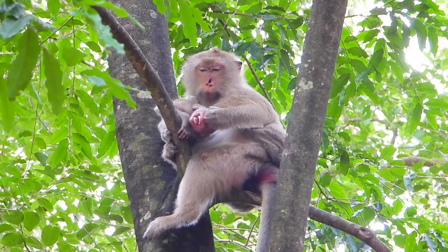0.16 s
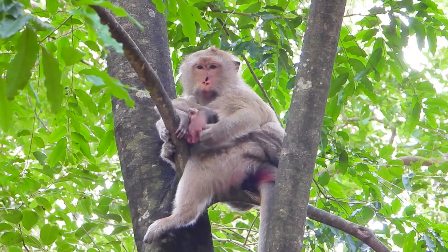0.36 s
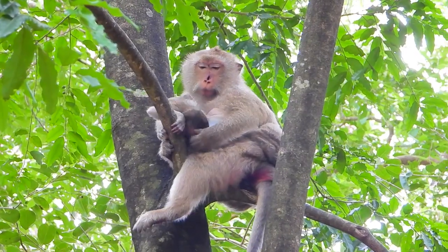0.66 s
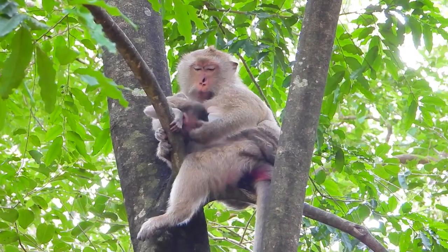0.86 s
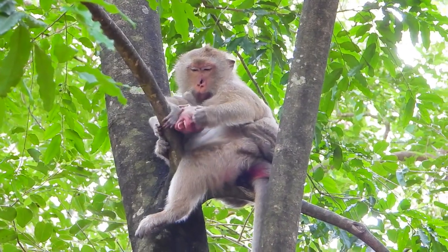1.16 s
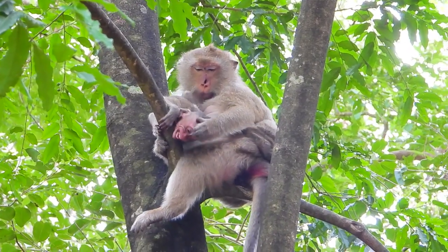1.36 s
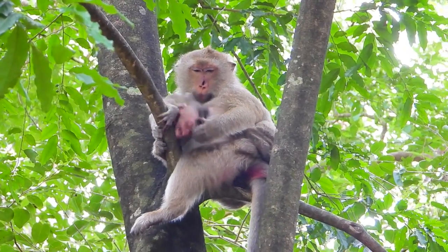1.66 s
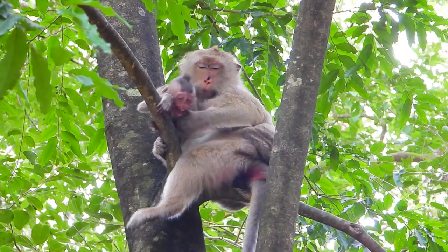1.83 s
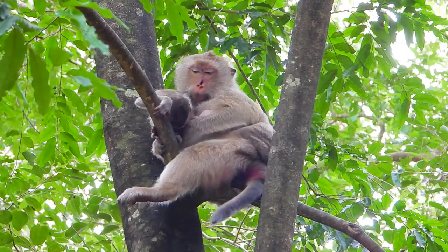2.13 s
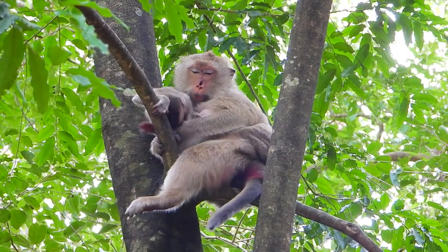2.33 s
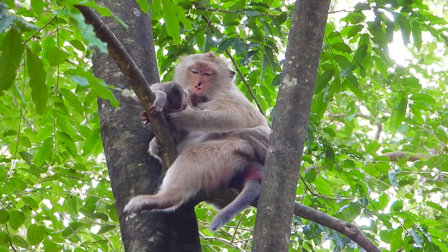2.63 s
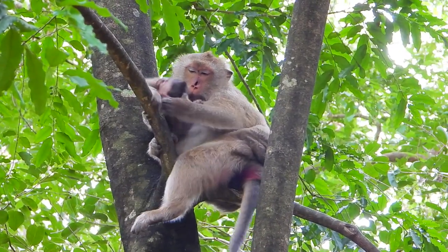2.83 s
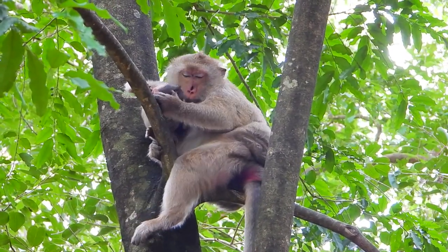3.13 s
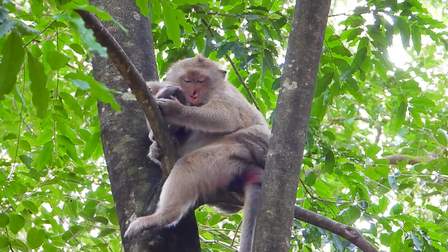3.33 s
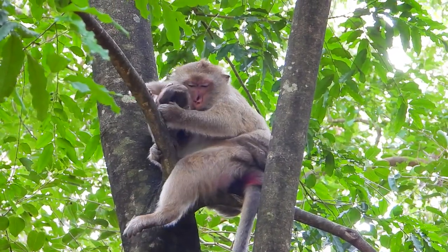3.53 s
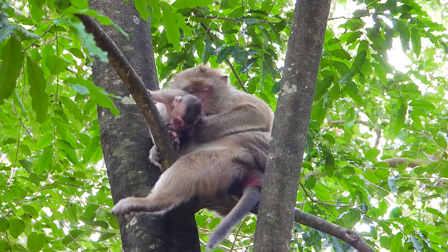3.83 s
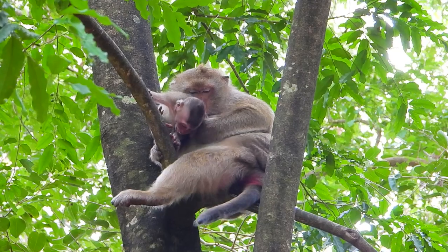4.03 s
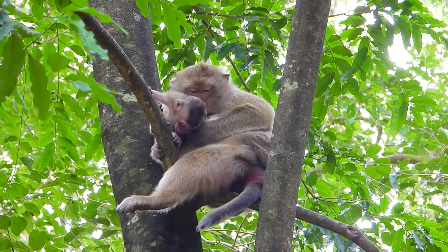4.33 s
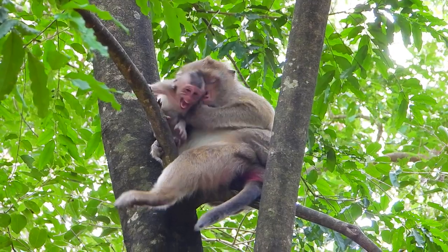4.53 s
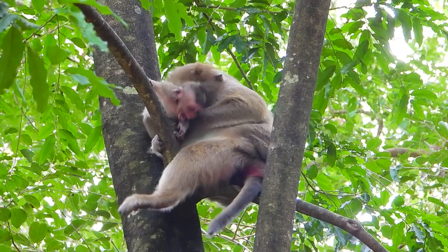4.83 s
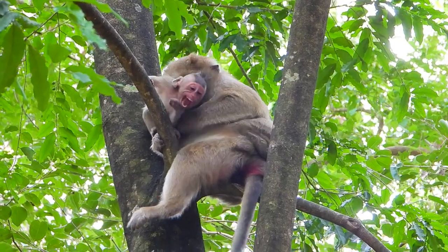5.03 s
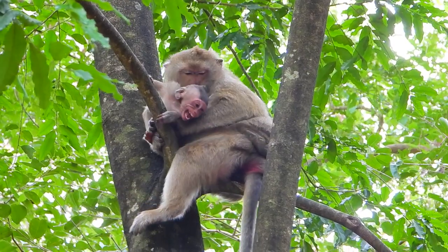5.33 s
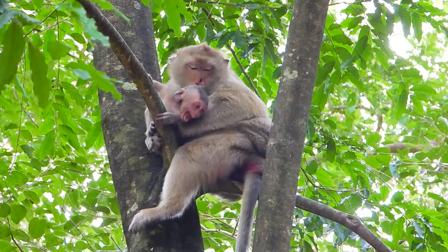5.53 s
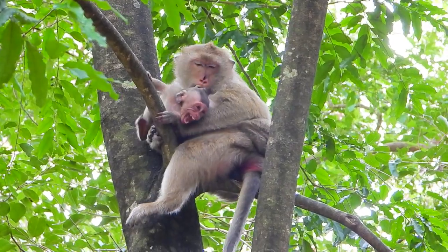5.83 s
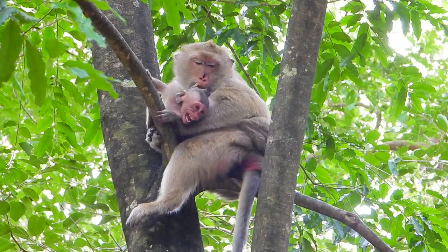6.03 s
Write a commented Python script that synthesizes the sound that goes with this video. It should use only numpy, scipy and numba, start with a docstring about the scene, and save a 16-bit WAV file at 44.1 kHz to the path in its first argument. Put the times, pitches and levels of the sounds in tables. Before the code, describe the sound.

Repeated shrill, rasping screams from a small macaque, each ending in a falling whistle, over faint forest murmur and leaf hiss.

```python
"""A rasping screech is already under way: a young macaque, held by an adult up in a tree, screams repeatedly.
Most screams open with a thin gliding whistle, break into a screech and end on a whistle that drops in pitch.
Ragged pulses ring the throat's resonances; the whistles are sine tones with weak, wavering overtones. Close
surfaces, trunks and canopy echo it over a low murmur and a hiss of leaves, both of filtered noise. A faint
hoot, a sine with a slightly wavering pitch, sounds early on; later two quick knocks of noise ring a twig."""
import sys
import numpy as np
from scipy import signal
from scipy.fft import rfft, irfft
from scipy.io import wavfile
from scipy.ndimage import uniform_filter1d
from numba import njit

SR = 44100
rng = np.random.default_rng(int(sys.argv[2]) if len(sys.argv) > 2 else 0)


def output_pcm(signal):
    """Save a mono or channel-first signal as 16-bit PCM at the path in sys.argv[1].

    Samples are clipped to [-1, 1] before scaling.
    """
    pcm = np.clip(np.atleast_2d(signal).T, -1, 1) * 32767
    wavfile.write(sys.argv[1], SR, np.round(pcm).astype(np.int16))


N = 272538
T = np.arange(N) / SR


def undb(db):
    """Decibels to gain."""
    return 10 ** (np.asarray(db) / 20)


def unit(x):
    """Scale to rms 1."""
    return x / np.sqrt(np.mean(x ** 2))


def walk(rate):
    """Smooth random motion with a spread of 1, taking a new value `rate` times a second."""
    return unit(np.interp(T * rate, np.arange(N), rng.standard_normal(N)))


def bump(x, width):
    """A bell of height 1 around x = 0, down to 1/e at the width."""
    return np.exp(-(x / width) ** 2)


def ramp(x, start, end):
    """0 before the start, 1 after the end."""
    return np.clip((x - start) / max(end - start, 1e-4), 0, 1)


def low_pass(x, order, hz):
    """Take off the treble above a corner."""
    return signal.sosfilt(signal.butter(order, hz, fs=SR, output="sos"), x)


def high_pass(x, order, hz):
    """Take off the bass below a corner."""
    return signal.sosfilt(signal.butter(order, hz, "high", fs=SR, output="sos"), x)


def colour(x, points):
    """Filter by a (Hz, dB) outline, straight lines over log frequency."""
    points_hz, db = np.transpose(points)
    f = np.fft.rfftfreq(x.shape[-1], 1 / SR)
    gain = undb(np.interp(np.log(f + 1), np.log(points_hz + 1), db))
    return irfft(rfft(x) * gain, x.shape[-1])


def controls(tables, fade_s):
    """Join the curves of all calls; also a gate that is open during each."""
    columns = np.vstack(tables).T
    outside_s = np.min([np.maximum(rows[0][0] - T, T - rows[-1][0]) for rows in tables], axis=0)
    gate = np.clip(1 - outside_s / fade_s, 0, 1) ** 2
    return gate, [np.interp(T, columns[0], curve) for curve in columns[1:]]


@njit
def svf(x, hz, width):
    """State-variable band-pass with a moving centre."""
    y, band, low = np.empty(len(x)), 0., 0.
    for i in range(len(x)):
        g, k = np.tan(np.pi * hz[i] / SR), width / hz[i]
        v = (band + g * (x[i] - low)) / (1 + g * (g + k))
        band, low, y[i] = 2 * v - band, low + 2 * g * v, k * v
    return y


def resonate(x, hz, width_hz):
    """A steep resonance: two band-passes in a row, each of the given width."""
    centre = np.clip(hz + np.zeros(len(x)), 20, SR / 2 - 2000)
    once = svf(x, centre, float(width_hz))
    return svf(once, centre, float(width_hz))


def saturate(x, drive=1.0):
    """The swing of the folds is limited, which evens out the strongest cycles."""
    x = unit(x)
    envelope = np.abs(drive * signal.hilbert(x))
    return unit(x / np.sqrt(1 + envelope ** 2))


# how far below full level the lower resonance and growl, the upper resonance and the rasp start
ONSET_DB, UPPER_ONSET_DB, RASP_ONSET_DB = -13.5, -24, -6.5
# half-lengths of the surge and the growl; the growl away from its peak
SURGE_S, GROWL_S, GROWL_REST_DB = 0.049, 0.03, -12
# rise of the upper resonance over a screech; rasp change in dB per squared share of length from its peak
UPPER_RISE_DB, RASP_ARCH_DB = 1.5, -14.5
# share of the length where the mouth starts to close; what each part loses by the end
CLOSE_AT, CLOSE_LOWER_DB, CLOSE_UPPER_DB, CLOSE_RASP_DB = 0.78, -1.5, -28, -23
# the lower resonance moves late; where the upper one ends up; centre of the growl
GLIDE_POWER, UPPER_END_HZ, GROWL_HZ = 1.8, 6310, 3240

# The screeches. Each row: start in seconds, length in seconds, attack in seconds, lower resonance level in dB,
# surge place (all places are shares of the length, 0-1), surge in dB, upper resonance level in dB,
# rasp peak place, rasp level in dB, growl peak place, growl level in dB, lower resonance in Hz at start,
# and at end, upper resonance in Hz at start, head-turn balance (left minus right) in dB at start, and at end.
# Levels are before the trims in monkey().
SCREECHES = [ (-.2, 0.27, 0.083, -32.5, 0.94, 2.5, -28, .7, -42.5, 0.69, -47.5, 4417, 4300, 6300, 16, 1),
             (.462, .032, 0.0045, -42.5, .3, 4, -43, 0.3, -46, .3, -56, 4315, 4330, 6660, -3, 2),
             (.51, .25, 0.059, -33.5, .52, 2.5, -36.5, 0.15, -49.5, 0.54, -45, 4666, 4050, 6900, 2, 2.5),
             (1.144, 0.21, .001, -32.5, .62, 3, -31.5, 0.21, -40, 0.31, -41.5, 4598, 4736, 7500, -2.5, 3),
             (1.744, 0.033, .005, -43, 0.49, -4, -32.5, 0.62, -44, .5, -57, 4359, 4433, 6950, -2.5, 4),
             (1.786, 0.25, .085, -31, 0.38, 5, -37, .45, -42.5, 0.78, -44.5, 4605, 4653, 7000, 1, 3),
             (2.369, 0.22, .05, -38.5, 0.66, 8.5, -34.5, .3, -47, 0.79, -48.5, 4554, 4194, 5847, 6, 9),
             (2.94, 0.29, .11, -33.5, 0.82, 5.5, -33.5, 0.48, -44.5, .7, -53, 4540, 4355, 6170, 2, 2.5),
             (3.735, .34, 0.11, -28.5, 0.933, 1, -28, 0.18, -42, 0.54, -46, 4675, 4305, 6930, 5, 4.5),
             (4.539, 0.28, 0.063, -34, 0.33, 10, -31.5, 0.32, -44.5, 0.82, -36, 4700, 4093, 6600, 0, 5),
             (5.019, .235, 0.08, -33, 0.922, 4, -32.5, 0.69, -43.5, 0.86, -46.5, 4890, 4270, 7324, 4, -8.5),
             (5.642, 0.34, 0.07, -33, .36, 4.5, -28.5, 0.09, -41.5, 0.34, -46, 4758, 4664, 6320, -1, 2.5)]


def screech(start, length, attack, db, surge_at, surge_db, upper_db, rasp_at, rasp_db,
            growl_at, growl_db, first_hz, last_hz, upper_hz):
    """Attack, one surge, then the mouth closes, treble first; the resonances glide all along.
    Rows (s, lower dB, upper dB, rasp dB, growl dB, lower Hz, upper Hz)."""
    u = np.linspace(0, 1, 100)
    slack = 1 - ramp(u * length, 0, attack)
    closing = ramp(u, CLOSE_AT, 0.97) ** 2
    surge = surge_db * bump((u - surge_at) * length, SURGE_S)
    growl_dip = GROWL_REST_DB * (1 - bump((u - growl_at) * length, GROWL_S))
    lower = db + ONSET_DB * slack + surge + CLOSE_LOWER_DB * closing
    upper = upper_db + UPPER_ONSET_DB * slack + UPPER_RISE_DB * (u - .5) + CLOSE_UPPER_DB * closing ** 2
    rasp = rasp_db + RASP_ARCH_DB * (u - rasp_at) ** 2 + RASP_ONSET_DB * slack + CLOSE_RASP_DB * closing
    growl = growl_db + ONSET_DB * slack + growl_dip
    lower_glide = first_hz + (last_hz - first_hz) * u ** GLIDE_POWER
    upper_glide = upper_hz + (UPPER_END_HZ - upper_hz) * u
    return np.column_stack([start + u * length, lower, upper, rasp, growl, lower_glide, upper_glide])


# closing note: level at its start and end relative to its peak, pitch ratio of the drop, bend of the sag
EMERGE_DB, DROP_DB, DROP_RATIO, SAG_POWER = -6, -14.5, .83, 2.3

# The whistle that comes through as a scream ends. Each row: start in seconds, sag in seconds,
# drop in seconds, pitch at the start in Hz, pitch where the drop begins in Hz, peak level in dB before trims.
CLOSING_NOTES = [ (-.03, .088, .027, 4300, 4100, -36), (.66, .085, .033, 4350, 4130, -34),
                 (1.228, .109, .031, 4750, 4100, -37), (1.88, .165, .025, 4750, 4220, -34),
                 (2.48, .112, .012, 4550, 4050, -28), (3.08, .11, .045, 4550, 4250, -39),
                 (4.025, .047, .014, 5300, 4050, -25), (4.72, .048, .022, 6700, 6450, -35),
                 (5.065, .178, .016, 4850, 4200, -31.5), (5.89, .063, .029, 5600, 4500, -31)]


def closing_note(start, sag, drop, start_hz, drop_hz, db):
    """Grows while its pitch sags, then falls in pitch and level as the pressure goes: rows (s, Hz, dB)."""
    t = np.linspace(0, sag + drop, 100)
    grow, fall = ramp(t, 0, sag), ramp(t, sag, sag + drop)
    hz = (start_hz + (drop_hz - start_hz) * grow ** SAG_POWER) * DROP_RATIO ** fall
    return np.column_stack([start + t, hz, db + EMERGE_DB * (1 - grow) + DROP_DB * fall])


# a chirp swells as it slides and fades after its leap; the held note creeps up
CHIRP_SWELL_DB_PER_S, CHIRP_FADE_DB_PER_S, CREEP_HZ_PER_S = 635, 93.5, 11000
# time constant of the leap in pitch; time that the level takes to change over
LEAP_S, REGISTER_S = 0.018, 0.0084

# Whistled chirps that open the screams. Each row: start in seconds, slide in seconds, hold in seconds,
# tail in seconds, starting pitch in Hz, note in Hz, pitch the leap heads for in Hz, note level in dB,
# level after the leap in dB before the fade. Levels are before trims.
CHIRPS = [ (.437, .033, .017, .05, 3000, 4020, 7700, -37, -44),
          (1.09, .034, .011, .033, 5900, 3850, 4850, -38, -28),
          (1.169, .014, .017, .02, 8100, 8750, 8950, -34, -35),
          (1.672, .012, .008, .021, 1250, 1330, 2100, -55, -57),
          (1.714, .021, .002, .012, 2100, 3450, 4100, -33, -32),
          (1.75, .01, .003, .087, 3950, 4150, 7350, -33, -32),
          (2.336, .036, .021, .045, 2900, 3700, 4800, -42, -35),
          (2.884, .04, .007, .042, 3800, 4300, 6000, -28.5, -38),
          (3.686, .002, .004, .007, 4000, 3920, 4000, -39, -43),
          (3.699, .011, .017, .1, 4000, 4130, 7700, -28.5, -35.5),
          (4.447, .017, .02, .022, 3000, 3850, 6500, -43, -45),
          (4.507, .006, .002, .075, 5550, 4700, 8000, -49, -45),
          (5.0, .018, .004, .034, 6600, 5250, 6400, -38, -38),
          (5.577, .007, .004, .009, 5450, 5350, 3000, -41, -41),
          (5.598, .009, .002, .01, 4500, 5250, 4000, -39, -39),
          (5.62, .002, .001, .077, 4750, 4800, 8300, -41, -42)]


def chirp(start, slide, hold, tail, start_hz, note_hz, last_hz, note_db, last_db):
    """Swells while sliding onto a note, creeps up, leaps to another register and fades: rows (s, Hz, dB)."""
    t = np.linspace(0, slide + hold + tail, 100)
    sliding = 1 - ramp(t, 0, slide)
    since_leap = np.maximum(t - slide - hold, 0)
    hz = note_hz + (start_hz - note_hz) * sliding ** 2 + CREEP_HZ_PER_S * np.clip(t - slide, 0, hold)
    hz = last_hz + (hz - last_hz) * np.exp(-since_leap / LEAP_S)
    db = note_db + (last_db - note_db) * ramp(since_leap, 0, REGISTER_S)
    db = db - CHIRP_FADE_DB_PER_S * since_leap - CHIRP_SWELL_DB_PER_S * slide * sliding
    return np.column_stack([start + t, hz, db])


def whistle(notes, chaos, jitter=0.01376, second_db=-19, third_db=-36, break_db=2.0, steady_db=-31):
    """The folds vibrate near one frequency, less steadily during a screech. Gives the tone and its strength."""
    gate, (hz, db) = controls(notes, fade_s=.004)
    # a firmly blown whistle locks into a pure tone; a weak one quavers
    unsteady = np.clip((steady_db - db) / 10, .15, 1)
    quaver = unsteady * (.016 * walk(190) + jitter * walk(900))
    tearing = .032 * chaos ** 2 * walk(1100)
    hz = uniform_filter1d(hz, size=150) * (1 + quaver + tearing)
    phase = 2 * np.pi * np.cumsum(hz) / SR
    second = undb(second_db) * np.sin(2 * phase)
    third = undb(third_db) * np.sin(3 * phase) * (3 * hz < SR / 2)
    # the overtones have their set levels where unsteady is one half
    tone = low_pass(np.sin(phase) + 2 * unsteady * (second + third), 4, 11000)
    shimmer_db = (1.8 * unsteady + 1.5 * chaos) * walk(380)
    strength = gate * undb(db + shimmer_db - break_db * chaos)
    return unit(tone) * strength, strength


def chaotic_folds(hz, jitter=.3, air=0.5, uneven_db=0.0):
    """Folds that slap shut at irregular moments and in ragged bursts, with air rushing through."""
    cycles = np.cumsum(hz * np.exp(jitter * walk(4000))) / SR
    slaps = np.diff(cycles % 1, prepend=0) * undb(uneven_db * walk(3000))
    bursts = undb(1.8 * walk(600))
    return (unit(slaps) + air * rng.standard_normal(N)) * bursts


# Colour of the breathy rasp. Each row: frequency in Hz, gain in dB.
RASP = [(1000, -9.5), (2300, 1), (2900, -28), (3600, -22.5), (5000, 21.5), (7500, 6.5), (10000, 6),
        (11500, 1.5), (13500, -4.5), (15500, -15)]


def monkey(lower_db=-2, upper_db=-7.0, rasp_db=4.5, growl_db=-3, opening_db=-0.44, ending_db=-0.7,
           leak_db=-13, leak_top_db=-47):
    """The screech rings the throat's resonances; the whistle leads in and out of it."""
    screeches = [screech(*row[:-2]) for row in SCREECHES]
    gate, (low_db, high_db, air_db, deep_db, low_hz, high_hz) = controls(screeches, fade_s=0.016)
    folds = chaotic_folds(low_hz)
    tremor = 1 + .04 * walk(220)
    lower = saturate(resonate(folds, low_hz * tremor, width_hz=1170))
    upper = saturate(resonate(folds, high_hz * tremor, width_hz=1140))
    throat = lower * undb(low_db + lower_db) + upper * undb(high_db + upper_db)
    # the tiny throat radiates little below its first resonance
    throat = high_pass(throat, 10, 3500)
    # at full strain a deeper, growling band joins in
    growl = saturate(resonate(folds, GROWL_HZ, width_hz=590)) * undb(deep_db + growl_db)
    rasp = unit(colour(folds, RASP))
    scream = gate * (throat + growl + rasp * undb(air_db + rasp_db))

    chaos = uniform_filter1d(gate, size=1500)
    opening = whistle([chirp(*row) for row in CHIRPS], chaos)
    closing_notes = [closing_note(*row) for row in CLOSING_NOTES]
    ending = whistle(closing_notes, chaos, jitter=.018, second_db=-23, break_db=5.5)
    tone, strength = undb(opening_db) * np.array(opening) + undb(ending_db) * np.array(ending)
    # air leaks past the folds during the whistle as well
    leak = low_pass(rasp, 2, 9000) * np.minimum(strength * undb(leak_db), undb(leak_top_db))
    return scream + tone + leak


def head_turn():
    """Left minus right in dB: the head turns steadily through each screech and on to the next."""
    times = [(start, start + length) for start, length, *_ in SCREECHES]
    return np.interp(T, np.ravel(times), np.ravel([row[-2:] for row in SCREECHES]))


def ports(x, lag_s=.000016, shade_db=6.0):
    """The sound reaches the left microphone port first; its treble is stronger on the right."""
    f = np.fft.rfftfreq(N, 1 / SR)
    tilt_db = shade_db * np.interp(f, [4000, 8000], [-.2, 1])
    late = np.exp(-2j * np.pi * f * lag_s)
    return irfft(rfft(x) * np.array([undb(-tilt_db), undb(tilt_db) * late]), N)


# Echoes off the adult's body, the branch and the trunks. Each row: mean delay in seconds, gain in dB.
REFLECTIONS = [(.0011, -5.5), (.0018, -4.5), (.0029, -17), (.0044, -2), (.0056, -31), (0.0082, -10),
               (0.0161, -8)]


def perch(x, sway_s=0.00013, spread_s=.000025, turn_share=1.0):
    """Short echoes off close surfaces shift as the animal wriggles; each port has its own delay."""
    turn_db = turn_share * head_turn() / 2
    out = ports(x) * undb(np.array([turn_db, -turn_db]))
    # a finer time grid keeps the treble intact under moving delays
    fine = signal.resample_poly(x, 4, 1)
    fine_t = np.arange(len(fine)) / (4 * SR)
    for delay_s, db in REFLECTIONS:
        path_s, skew_s = delay_s + sway_s * walk(1.2), spread_s * walk(1)
        echo = [np.interp(T - path_s + sign * skew_s, fine_t, fine, left=0) for sign in (-1, 1)]
        out = out + undb(db) * np.array(echo)
    return out


# Colour of the echoing canopy. Each row: frequency in Hz, gain in dB.
ECHO = [(700, -6.5), (2500, -2.5), (3200, -1.5), (3800, -2.5), (4500, -2.5), (5500, -3), (7000, -6),
        (10000, 1), (15000, -0.5)]


def forest_echo(x, tail_db=-11.5, t60_s=0.96, near_db=-17, near_s=0.059, build_s=0.07, side=0.72):
    """Nearby trunks answer at once; the wider canopy scatters a long tail that loses its treble."""
    t = T[:int(SR * 1.5)]
    noise = rng.standard_normal((4, len(t)))
    low = signal.sosfiltfilt(signal.butter(3, 8000, fs=SR, output="sos"), noise[:2])
    treble = noise[:2] - low
    treble_t60_s = .7 * t60_s
    tail = low * undb(-60 * t / t60_s) + treble * undb(-60 * t / treble_t60_s)
    tail = undb(tail_db) * colour(unit(tail * (1 - np.exp(-t / build_s))), ECHO)
    near = undb(near_db) * unit(noise[2:] * np.exp(-t / near_s) * (t > .001))
    mid, wide = (tail + near) / np.sqrt(len(t))
    response = np.array([mid + side * wide, mid - side * wide])
    return signal.fftconvolve(x[None], response, axes=1)[:, :N]


# the murmur swells with each screech: by how much, at which share of its length, half-length of the swell
MURMUR_LIFT_DB, MURMUR_LIFT_AT, MURMUR_LIFT_S = 3, 0.19, 0.1

# Slow drift of the murmur. Each row: time in seconds, level in dB before lift and trim.
MURMUR_DB = [(0, -70.5), (1.0, -63.5), (2.7, -65), (3.7, -60.5), (4.15, -63.5), (6.18, -66)]


def murmur_level():
    """Level in dB: a slow drift, and a small swell with each screech."""
    swells = [bump(T - start - MURMUR_LIFT_AT * length, MURMUR_LIFT_S) for start, length, *_ in SCREECHES]
    return np.interp(T, *np.transpose(MURMUR_DB)) + MURMUR_LIFT_DB * np.max(swells, axis=0)


# Colour of the forest murmur. Each row: frequency in Hz, gain in dB.
MURMUR = [(15, -77), (25, -47), (70, -61), (90, -14), (187, -0.5), (252, -7), (332, -1.5), (438, -8),
          (493, -4.5), (555, -6.5), (840, -6), (1200, -11), (1580, -9), (2800, -12), (3640, -17),
          (6160, -120)]
# Colour of the hiss of the leaves. Each row: frequency in Hz, gain in dB.
LEAVES = [(2000, -10), (3000, -1), (4500, 6), (7000, 2), (11000, -12), (15000, -51)]


def forest_air(murmur_db=2.5, leaves_db=-64, murmur_side=0.29, leaves_side=1.0, flicker_db=3, swell_db=1):
    """A low noise murmur, its central bands flickering on their own, under a faint wide hiss of leaves."""
    sides = np.array([[1], [-1]])
    restless = np.zeros(N)
    for hz in np.geomspace(40, 2800, 30):
        restless += resonate(rng.standard_normal(N), hz, hz / 5) * undb(flicker_db * walk(22))
    mid, wide = unit(colour(restless, MURMUR)), unit(colour(rng.standard_normal(N), MURMUR))
    murmur = (mid + murmur_side * sides * wide) * undb(murmur_level() + murmur_db)
    mid, wide = unit(colour(rng.standard_normal((2, N)), LEAVES))
    leaves = (mid + leaves_side * sides * wide) * undb(leaves_db + swell_db * walk(5.28))
    return murmur + leaves


# A faint hoot in the forest. Each row: start in seconds, length in seconds, mean pitch in Hz, peak level in dB.
FAR_CALLS = [(1.072, 0.1, 790, -41.5)]


def far_calls(waver=0.007):
    """A soft, nearly pure hoot: a sine with a slightly wavering pitch."""
    out = np.zeros(N)
    for s, length, hz, db in FAR_CALLS:
        swell = np.sin(np.pi * np.clip((T - s) / length, 0, 1))
        phase = 2 * np.pi * np.cumsum(hz * (1 + waver * walk(120))) / SR
        out += undb(db) * swell * np.sin(phase)
    return out


# Hoarse undertones. Each row: start in seconds, length in seconds, mean pitch in Hz, level in dB before shimmer.
UNDERTONES = [(1.176, 0.08, 2380, -68), (3.126, 0.081, 2780, -50.5), (4.744, 0.042, 2752, -48),
              (5.816, 0.13, 2740, -53.5), (5.864, 0.17, 2170, -58.5)]


def undertones(jitter=0.053, shimmer_db=3):
    """Slack tissue flutters along below the screech."""
    out = np.zeros(N)
    for s, length, hz, db in UNDERTONES:
        swell = np.sin(np.pi * np.clip((T - s) / length, 0, 1))
        flutter = np.sin(2 * np.pi * np.cumsum(hz * (1 + jitter * walk(700))) / SR)
        out += undb(db + shimmer_db * walk(230)) * swell * flutter
    return out


# Knocks on a twig. Each row: time in seconds, level in dB before ring_db.
KNOCKS = [(3.575, -38.5), (3.588, -41)]
# Modes of the twig. Each row: frequency in Hz, width in Hz, gain in dB before ring_db.
TWIG = [(1089, 280, -9), (1500, 600, -2.5), (2175, 950, -14), (2960, 800, -13.5), (5200, 1800, -14)]


def twig(decay_s=0.0035, ring_db=17):
    """Short dry knocks, decaying bursts of noise, ring the modes of the wood."""
    push = sum(undb(db) * (T >= s) * np.exp(-np.abs(T - s) / decay_s) for s, db in KNOCKS)
    crack = push * rng.standard_normal(N)
    return undb(ring_db) * sum(undb(db) * resonate(crack, hz, width) for hz, width, db in TWIG)


def scene():
    """Sounds in the tree, their echo and the forest around."""
    direct = monkey() + undertones() + twig() + far_calls()
    return undb(-1.66) * perch(direct) + forest_echo(direct) + forest_air()


def record(dry, bass_hz=60, top_hz=15400):
    """The camera cuts the deep bass gently and the top steeply."""
    dry = high_pass(dry, 1, bass_hz)
    return signal.sosfilt(signal.ellip(10, .2, 80, top_hz, fs=SR, output="sos"), dry)


dry = scene()
out = record(dry)
output_pcm(out)
```